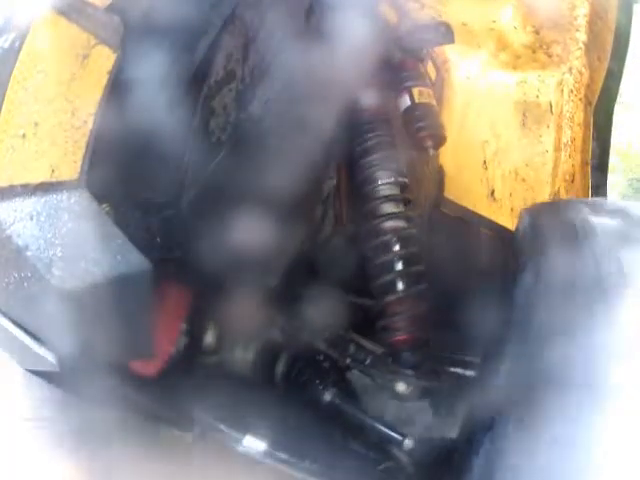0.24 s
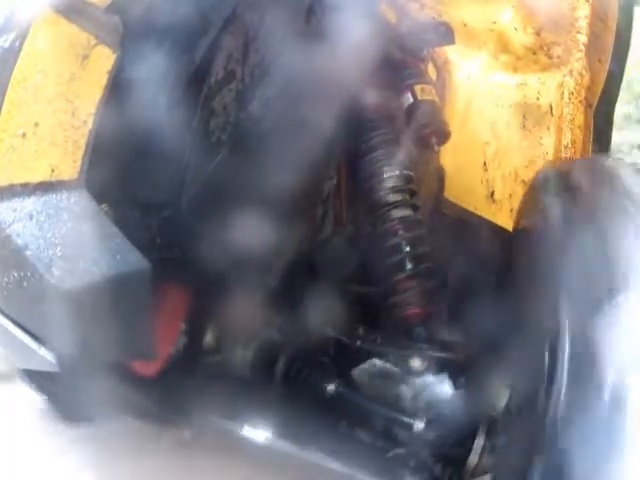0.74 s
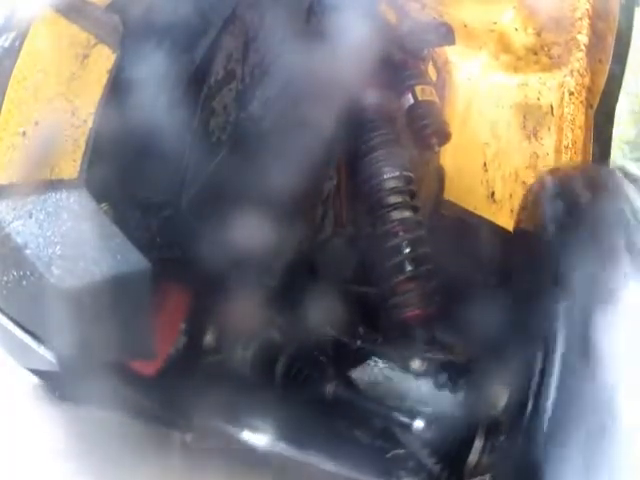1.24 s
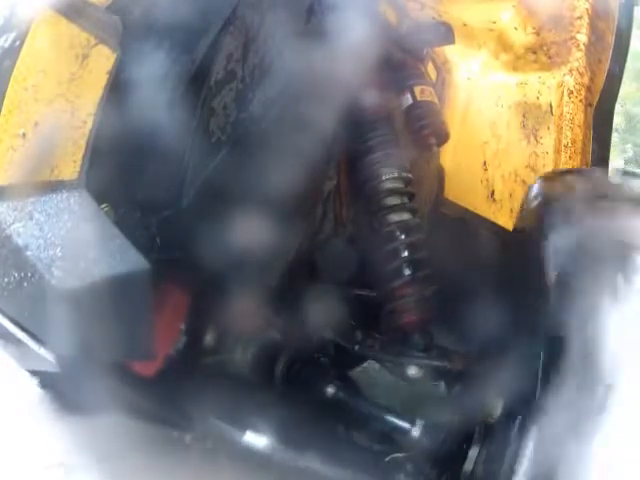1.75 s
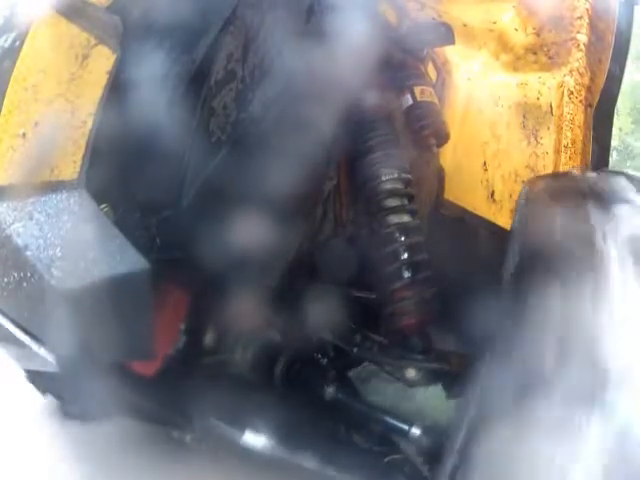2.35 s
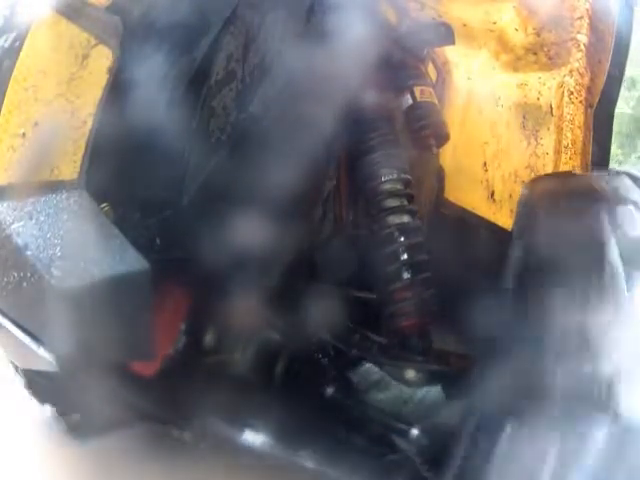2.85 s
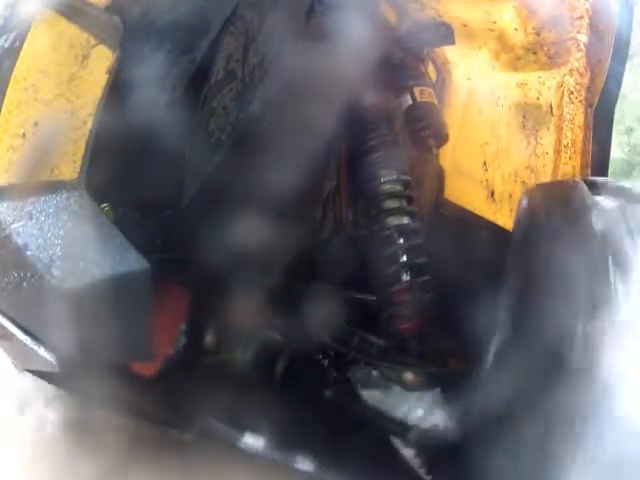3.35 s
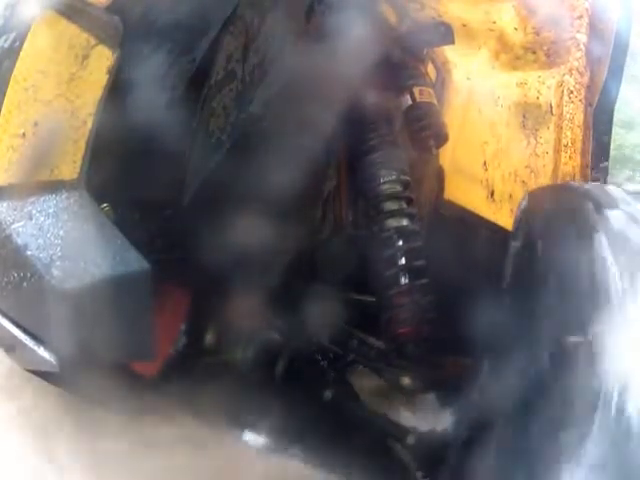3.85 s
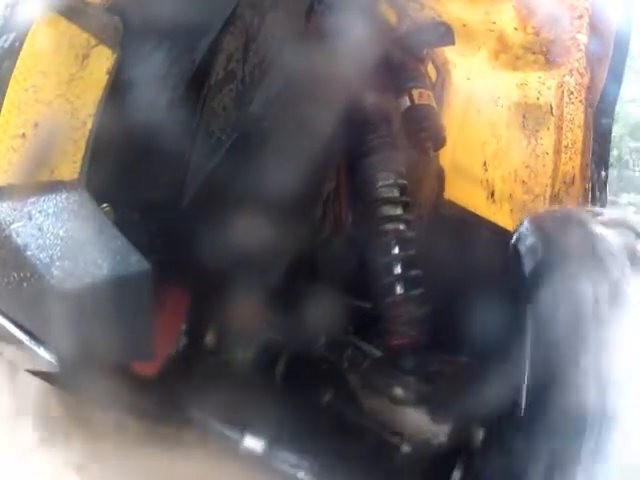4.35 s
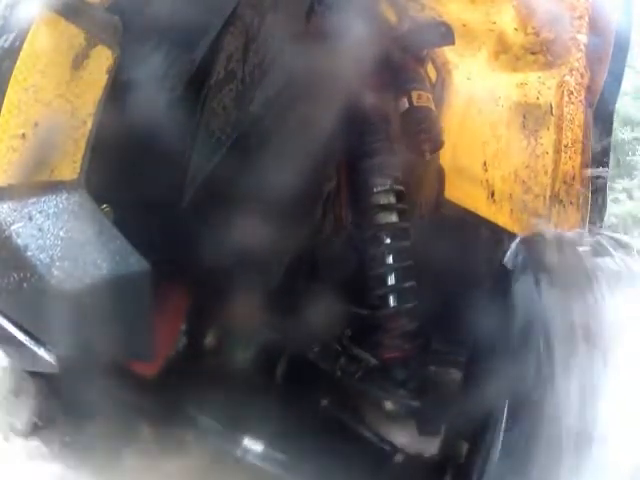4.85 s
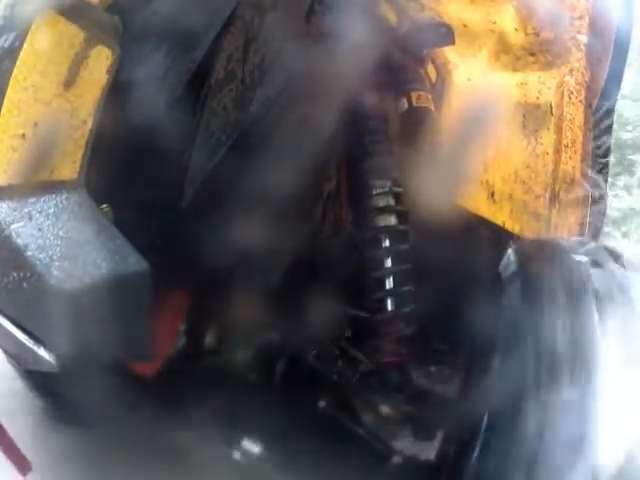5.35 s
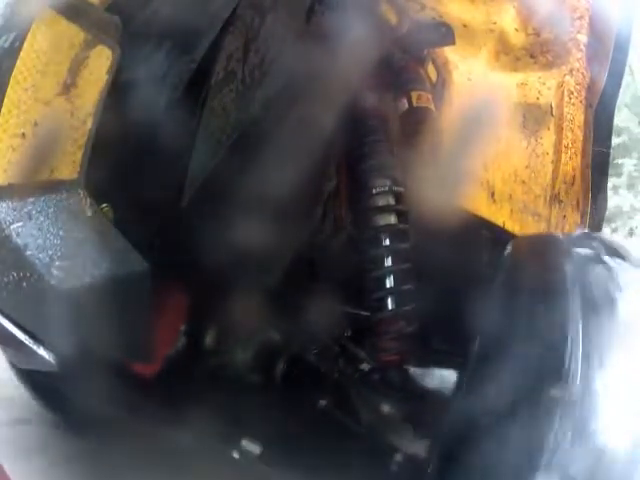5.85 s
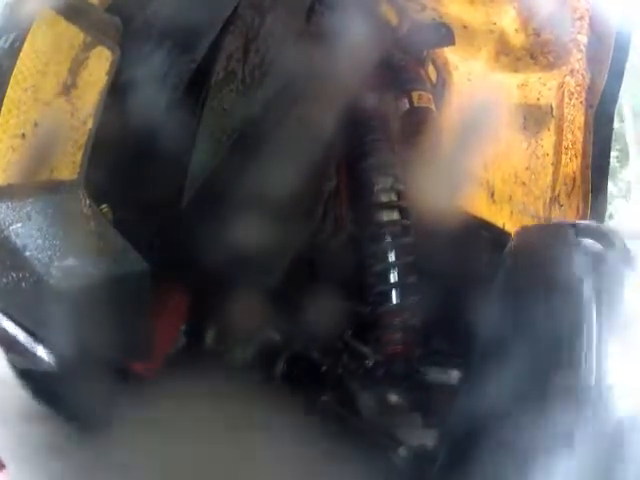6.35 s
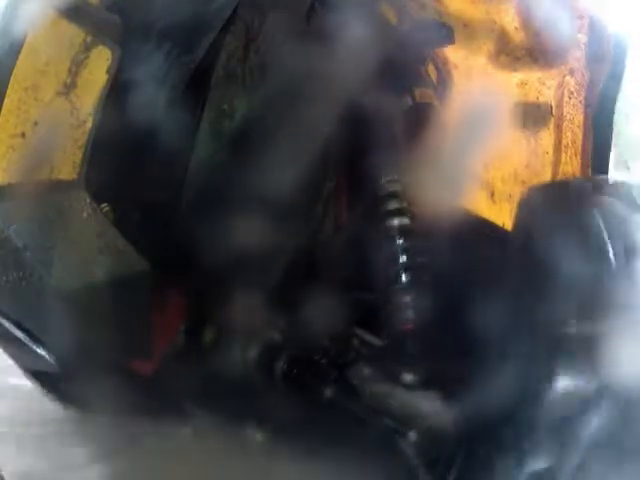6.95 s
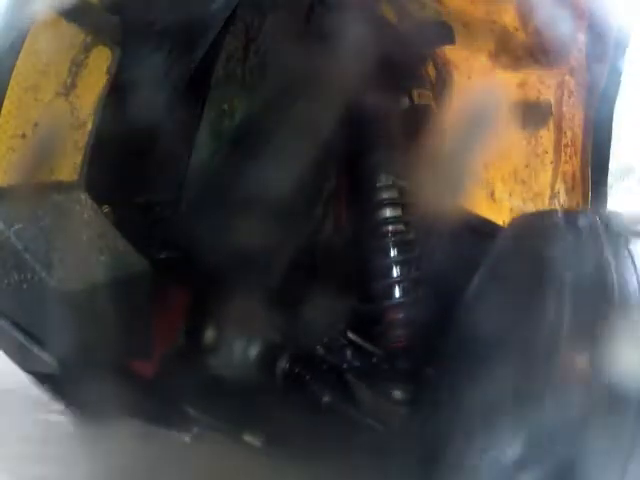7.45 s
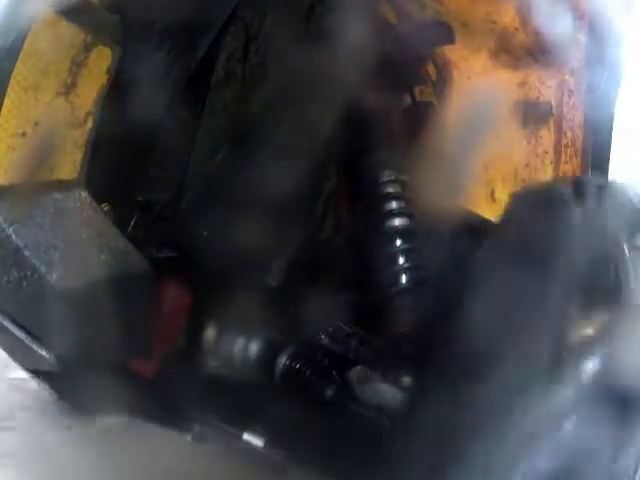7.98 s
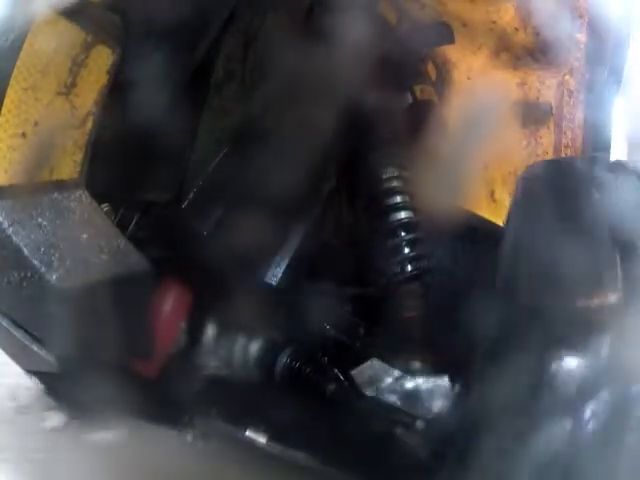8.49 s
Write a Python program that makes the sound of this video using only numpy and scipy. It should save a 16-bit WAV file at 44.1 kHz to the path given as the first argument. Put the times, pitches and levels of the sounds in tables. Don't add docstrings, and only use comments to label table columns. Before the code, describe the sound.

Close, boxy engine growl surges, sags and revs again through splashing water, then a hard double knock and a slowing, muddy chug.

```python
import sys
import numpy as np
from scipy import signal
from scipy.io import wavfile
from scipy.ndimage import uniform_filter1d

SR = 44100
rng = np.random.default_rng(int(sys.argv[2]) if len(sys.argv) > 2 else 0)


def ratio(d):
    e = np.asarray(d, float) / 20
    return 10 ** e


def wav_record(signal):
    frames = np.transpose(np.atleast_2d(signal))
    bounded = np.clip(frames, -1, 1)
    quanta = np.round(bounded * 32767).astype(np.int16)
    wavfile.write(sys.argv[1], SR, quanta)


N = 384552
T = np.arange(N) / SR

# t/s, level/dB
SPRAY_LEVEL = [(0.0, -59), (0.13, -56), (0.18, -44.5), (0.41, -44.5), (0.9, -46.5), (1.33, -51),
               (1.45, -59.5), (3.06, -62.5), (3.11, -50.5), (3.63, -43.5), (4.55, -44), (4.92, -49.5),
               (6.04, -56), (7.05, -56.5), (7.15, -51), (7.25, -51.5), (7.87, -62.5), (8.72, -66.5)]
# f/Hz, width/Hz, level/dB
SHELL_MODES = [(1350, 260, -6), (1746, 215, 4.5), (2186, 283, 3), (2762, 520, 1), (3448, 506, 2),
               (4390, 1340, -11.5), (5180, 1700, -16)]
# t/s, peak level/dB
LONE_TICKS = [(0.195, -36), (1.4394, -35), (3.1312, -30), (4.0841, -26), (4.1194, -27), (4.46, -54),
              (4.5322, -45), (4.6347, -29), (4.9636, -29), (4.9873, -23.5), (5.7535, -35), (5.8988, -38),
              (5.9296, -41), (6.0592, -42), (6.1181, -36), (6.2836, -36), (6.514, -32), (6.6602, -40),
              (6.671, -37), (6.8333, -37), (6.9567, -37), (7.0645, -37), (7.0927, -35), (7.284, -28),
              (7.3868, -43), (7.5669, -39), (7.6524, -38), (7.8547, -41)]
# first hard contact t/s, length/s, peak level/dB, unevenness (scale of the contact
CHATTER_BOUTS = [(4.6123, .1, -29, 0.05), (4.749, .13, -30, 0.64), (4.9005, .025, -25, 0.4),
                 (4.9966, .62, -27.5, 1.11), (5.67, .03, -30, 0.15), (5.794, .045, -31, 0.02),
                 (6.402, .06, -33, .6), (6.615, .03, -32.5, .2), (7.104, .065, -24.5, 0.08),
                 (7.181, .05, -23.5, 0), (7.4076, .015, -24.5, 0), (7.4935, .03, -31, 0)]
CONTACT_LEVELS = (-2.3, -2, -35, -4.5)
CHATTER_SCATTER_DB, CHATTER_JITTER_S = 1.6, .0008
# t/s, peak level/dB, thud level/dB
CASE_BLOWS = [(0.8684, -21, -11.5), (1.767, -25, -20), (1.806, -48, -13.5), (2.2104, -15, -19),
              (2.373, -54, -26), (2.808, -22, -34), (2.9213, -34, -32), (2.9547, -42, -28),
              (6.413, -18, -3), (6.4274, -5.5, -7.5), (7.1719, -1, -2), (7.8285, -57, -23),
              (8.006, -33, -23)]
# f/Hz, width/Hz, level/dB
BLOW_MODES = [(850, 240, -6), (1470, 220, -9), (1770, 170, 2.5), (2300, 150, -11.5), (3300, 330, -23),
              (4740, 970, -32)]
# t/s, crank f/Hz
CRANK_SPEED = [(0.0, 44.3), (0.55, 45.2), (0.78, 43.3), (1.05, 35.3), (1.25, 32.4), (1.65, 28.9),
               (1.97, 28.2), (2.27, 33.0), (4.35, 43.5), (5.25, 47.0), (5.85, 49.5), (6.37, 55.2),
               (6.6, 52.0), (7.12, 55.2), (7.5, 44.2), (8.0, 31.2), (8.2, 29.2), (8.72, 27.0)]
# t/s, level/dB
EFFORT = [(0.0, -13.5), (0.12, 0.5), (0.75, -1.5), (1.03, -11.5), (1.1, -2.5), (1.45, -8.5), (2.06, -10),
          (2.94, -7), (3.54, -4), (3.74, 0.5), (5.54, 0), (5.85, 3), (6.09, 0), (6.17, 1), (7.14, 1),
          (7.9, -2), (8.45, -13.5), (8.72, -8.5)]
# start t/s, end t/s, multiple of the crank f, level/dB
SINGING_ORDERS = [(0.12, 0.73, 5, -27.5), (1.2, 1.75, 15 / 2, -26.5), (1.5, 2.23, 6, -31.5),
                  (2.98, 3.5, 9 / 2, -27.5), (3.2, 3.9, 11 / 2, -25.5), (3.5, 3.95, 3, -23),
                  (3.8, 4.2, 21 / 2, -28.5), (4.3, 5, 10, -27.5), (4.8, 5.8, 5 / 2, -19),
                  (3.84, 4.3, 4, -23.5), (4.25, 5.85, 7 / 2, -20), (0.15, 0.75, 7 / 2, -28),
                  (5.8, 6.3, 21 / 2, -36), (5.97, 6.85, 7, -24), (6.6, 7.13, 7, -23.5),
                  (6.7, 7.2, 10, -31.5), (5.9, 7.2, 3 / 2, -30), (7.0, 7.5, 2, -20)]
# multiple of the crank f, level/dB
SHAKING_ORDERS = [(1, -9), (2.015, 0.1), (5 / 2, -3.5), (7 / 2, -7.5), (4, -8.5)]
# f/Hz, width/Hz, level/dB
MOUNT_MODES = [(41.1, 16.2, 4), (72, 23, -3.5), (95, 20.6, 0.3), (118.7, 10.5, 2), (165.4, 13, -1)]
# f/Hz, width/Hz, level/dB
FRAME_MODES = [(44.6, 30, -13), (80.5, 17.5, -4), (114.4, 8.7, 1.5), (161, 13.4, 2.5), (219.7, 23.1, -1.5),
               (263, 31, -7.5), (310, 46.4, -15.5)]
# f/Hz, width/Hz, level/dB
PANEL_MODES = [(347.4, 43.6, -2), (387.2, 28.6, 0), (441, 48.5, 1), (505, 36.3, 0.5), (548, 39, 3),
               (646, 123, -8.5), (836.4, 147.5, -6), (969, 61, -18)]
# f/Hz, width/Hz, level/dB
CASE_MODES = [(1320, 105, -3.5), (1677, 225, -0.5), (1854, 140, 1), (2166, 240, -12)]
# level/dB at full effort, dB per dB of effort
BOOM_LAW, BUZZ_LAW, CASE_LAW, LINE_LAW = (-17, 0.73), (-21, 0.95), (-39, 1.21), (-20, 0.56)
LINE_WAVER_DB, BOOM_WAVER_DB = 1.4, 1.2
DUCK_DB, DUCK_BACK_S, CLIP = -13.5, 0.12, .53


def unit(x):
    return x / np.sqrt(np.mean(x ** 2))


def columns(table):
    s, *cols = np.transpose(table)
    return [np.interp(T, s, c) for c in cols]


def ring(x, modes, order=1):
    out = 0
    for k, (hz, width, db) in enumerate(modes):
        y = x
        for _ in range(order):
            y = signal.lfilter(*signal.iirpeak(hz, hz / width, SR), y)
        out = out + (-1) ** k * ratio(db) * y
    return out


def walk(rate):
    hold = int(SR / rate)
    levels = np.repeat(rng.standard_normal(N // hold + 1), hold)
    slewed = uniform_filter1d(uniform_filter1d(levels, hold), hold)
    return unit(slewed[:N])


def steady(x):
    return x / np.sqrt(uniform_filter1d(x ** 2, size=SR // 4) + 1e-12)


def strikes(times, db, length_s):
    size = SR // 50
    burst = rng.standard_normal((len(times), size)) * np.exp(-np.arange(size) / (length_s * SR))
    burst[:, 0] = 5
    burst *= np.sqrt(length_s * SR / 2 / np.sum(burst ** 2, axis=1, keepdims=True))
    out = np.zeros(N + size)
    for s, level_db, push in zip(times, db, burst):
        start = int(s * SR)
        out[start:start + size] += ratio(level_db) * uniform_filter1d(push, size=3)
    return out[:N]


def spray():
    size_db = 3.2 * np.minimum(rng.exponential(size=N), 3)
    landing = rng.random(N) < 2500 / SR
    drops = landing * rng.standard_normal(N) * ratio(size_db)
    wash = unit(drops) + 0.88 * rng.standard_normal(N)
    gust_db = 1.13 * walk(14) + 0.32 * walk(50)
    level_db = columns(SPRAY_LEVEL)[0] + 6.5 + gust_db
    return ratio(level_db) * steady(ring(wash, SHELL_MODES, order=2))


def chatter():
    rows, hz = [], columns(CRANK_SPEED)[0]
    for start, length, db, uneven in CHATTER_BOUTS:
        at = np.arange(int(start * SR), int((start + length) * SR))
        halves = 2 * np.cumsum(hz[at]) / SR
        k = np.arange(80)
        chance = rng.standard_normal((80, 2))
        s = start + np.searchsorted(halves, k) / SR + CHATTER_JITTER_S * chance[:, 0]
        cycle_db = uneven * np.array(CONTACT_LEVELS)[k % 4]
        level_db = db + cycle_db + CHATTER_SCATTER_DB * chance[:, 1]
        rows.append(np.c_[s, level_db][k < halves[-1]])
    return np.concatenate(rows)


def ticks():
    s, db = np.concatenate([LONE_TICKS, chatter()]).T
    crack = ring(strikes(s, db + 1, .0018), [(4700, 2200, 0)], order=2)
    return ring(strikes(s, db + 9.5, 0.003), SHELL_MODES, order=2) + crack


def knocks():
    s, db, thud_db = np.transpose(CASE_BLOWS)
    thud = strikes(s, thud_db, 0.0027)
    case = ring(strikes(s, db + 17, 0.00048), BLOW_MODES, order=2)
    panel = ratio(19.5) * ring(thud, PANEL_MODES, order=2)
    frame = ratio(33.5) * ring(thud, FRAME_MODES[:2], order=2)
    return case + panel + frame


def whine():
    turns = np.cumsum(columns(CRANK_SPEED)[0]) / SR
    out, waver = np.zeros(N), walk(9)
    for start, end, multiple, db in SINGING_ORDERS:
        at = slice(int(start * SR), int(end * SR))
        fade = signal.windows.tukey(len(T[at]), .3)
        level_db = db + LINE_WAVER_DB * np.roll(waver, rng.integers(N))[at]
        order = round(2 * multiple) / 2
        tone = np.sin(2 * np.pi * order * turns[at])
        out[at] += fade * np.sqrt(2) * ratio(level_db) * tone
    return out


def through_mount(hz):
    power = 0
    for centre_hz, width, db in MOUNT_MODES:
        detuning = 2 * (hz - centre_hz) / width
        power = power + ratio(db) ** 2 / (1 + detuning ** 2) ** 2
    return np.sqrt(power)


def crank_orders(hz, turns, line_db):
    out = 0
    for multiple, db in SHAKING_ORDERS:
        level_db = db + line_db + LINE_WAVER_DB * walk(5)
        order = round(2 * multiple) / 2
        tone = np.sin(2 * np.pi * (order * turns + rng.random()))
        out = out + np.sqrt(2) * ratio(level_db) * through_mount(multiple * hz) * tone
    return out


def firings(cycle, second, second_db, scatter_db, jitter):
    whole = np.arange(int(cycle[-1]))
    at = np.sort(np.r_[whole, whole + second])
    chance = rng.standard_normal((len(at), 2))
    index = np.clip(np.searchsorted(cycle, at + jitter * chance[:, 0]), 0, N - 1)
    pulses = np.zeros(N)
    pulses[index] = ratio(scatter_db * chance[:, 1] + second_db * (np.arange(len(at)) % 2))
    return pulses


def engine():
    hz, load = columns(CRANK_SPEED)[0], columns(EFFORT)[0]
    laws = (BOOM_LAW, BUZZ_LAW, CASE_LAW, LINE_LAW)
    boom_db, buzz_db, case_db, line_db = (db + slope * load for db, slope in laws)
    turns = np.cumsum(hz * (1 + .004 * walk(12))) / SR
    lines = crank_orders(hz, turns, line_db)
    fire = firings(turns / 2 + .3, second=.45, second_db=-3, scatter_db=1.8, jitter=.005)
    shake = signal.lfilter([1], [1, -np.exp(-1 / (.008 * SR))], fire)
    shake = uniform_filter1d(shake, size=SR // 250)
    speed = hz / 45
    rest = (2.5, 1.5, .5 * speed ** 2.5)
    frame_rattle, panel_rattle, case_rattle = [(k + shake) * rng.standard_normal(N) for k in rest]
    boom = 0.37 * unit(ring(fire, FRAME_MODES[4:], order=2)) + unit(ring(frame_rattle, FRAME_MODES))
    push = 37.5 * fire + panel_rattle
    big_panels = speed ** 0.23 * ring(push, PANEL_MODES[:5], order=2)
    buzz = big_panels - ring(push, PANEL_MODES[5:], order=2)
    case = 0.2 * unit(ring(fire, CASE_MODES, order=2))
    case = case + 1.3 * unit(ring(case_rattle, CASE_MODES, order=2))
    boom = ratio(boom_db - 2.5 + BOOM_WAVER_DB * walk(14)) * steady(boom)
    buzz = ratio(buzz_db + 0.53 * walk(18)) * steady(buzz)
    case = ratio(case_db + 2.0 + 0.94 * walk(25)) * steady(case)
    return lines + boom + buzz + case


def scene():
    return (spray() + ticks() + knocks() + whine() + engine())[None]


def soft(x):
    return x / (1 + (x / CLIP) ** 6) ** (1 / 6)


def roll_off(x):
    return signal.sosfilt(signal.butter(12, 15420, fs=SR, output="sos"), x)


def record(dry):
    hardest_s = max(CASE_BLOWS, key=lambda blow: blow[1])[0]
    since = T - hardest_s - .004
    ducked = dry * ratio(DUCK_DB * (since > 0) * np.exp(-np.abs(since) / DUCK_BACK_S))
    slow = soft(signal.resample_poly(ducked, 40, 147, axis=1))
    held = signal.resample_poly(np.repeat(slow, 4, axis=1), 147, 160, axis=1)
    held = np.pad(held, ((0, 0), (0, 8)))[:, :N]
    low_pass = signal.ellip(12, .5, 60, 15050, fs=SR, output="sos")
    mix = signal.sosfilt(low_pass, held)
    return roll_off(mix)


dry = scene()
out = record(dry)
wav_record(out)
```